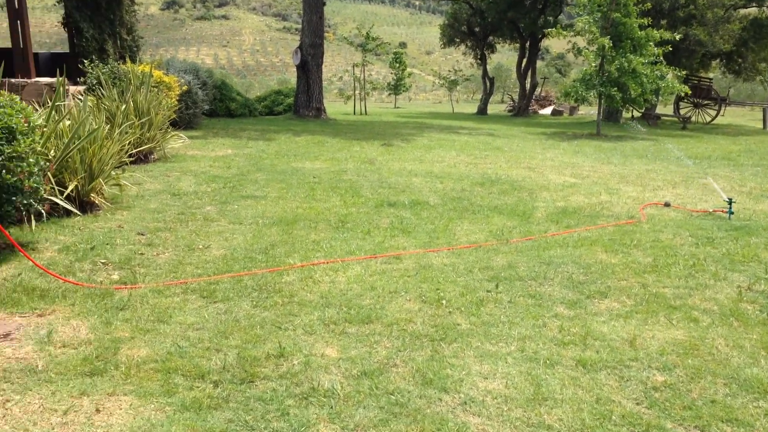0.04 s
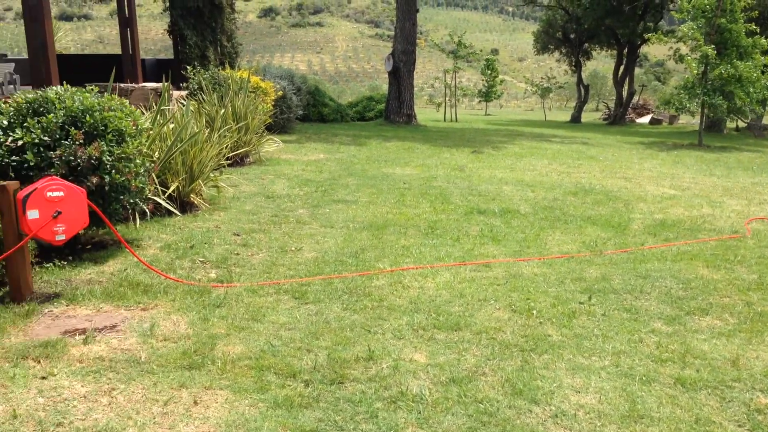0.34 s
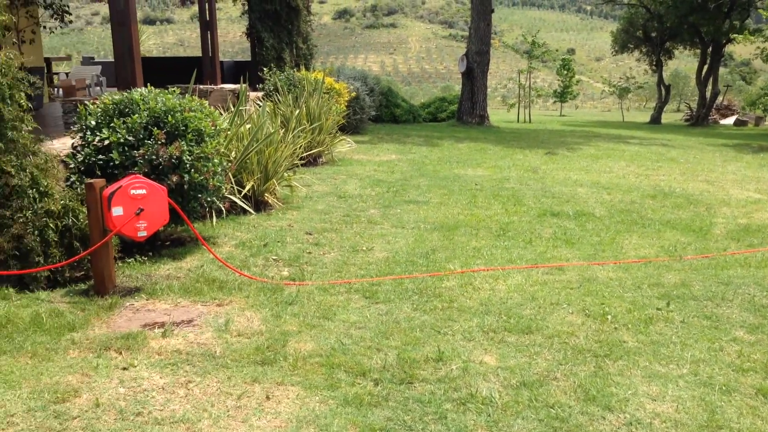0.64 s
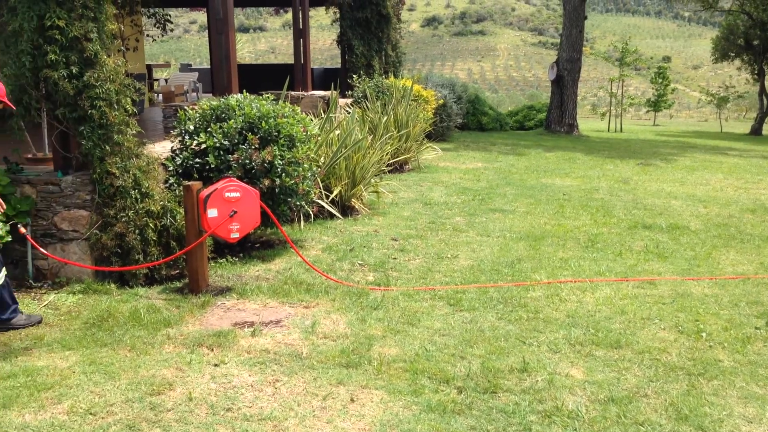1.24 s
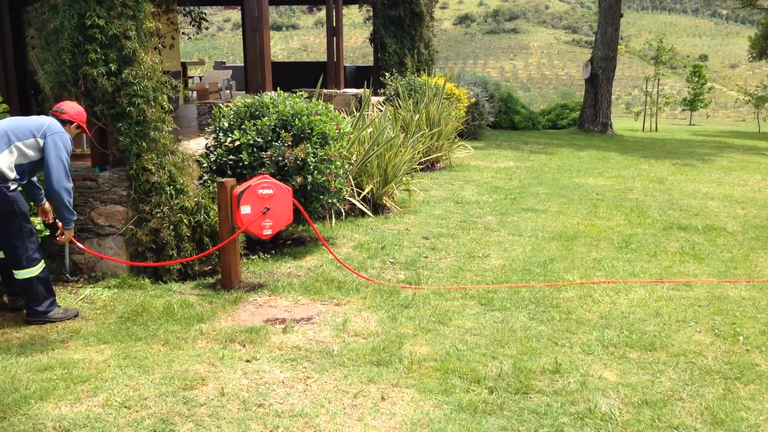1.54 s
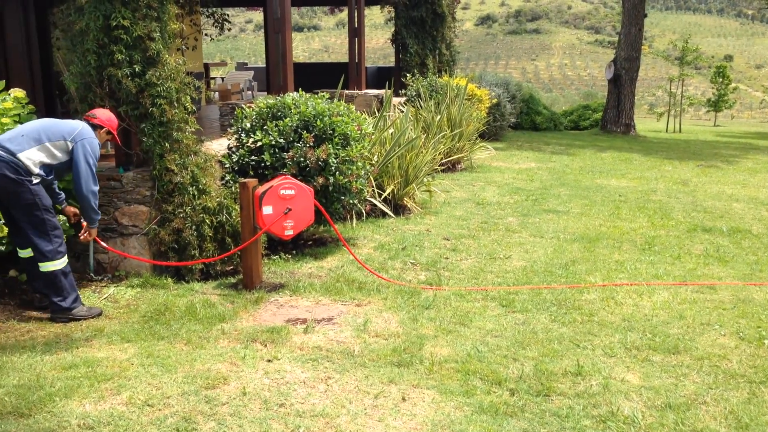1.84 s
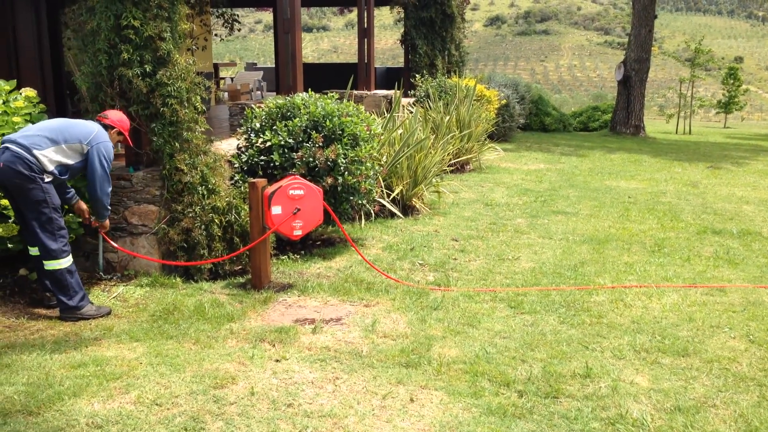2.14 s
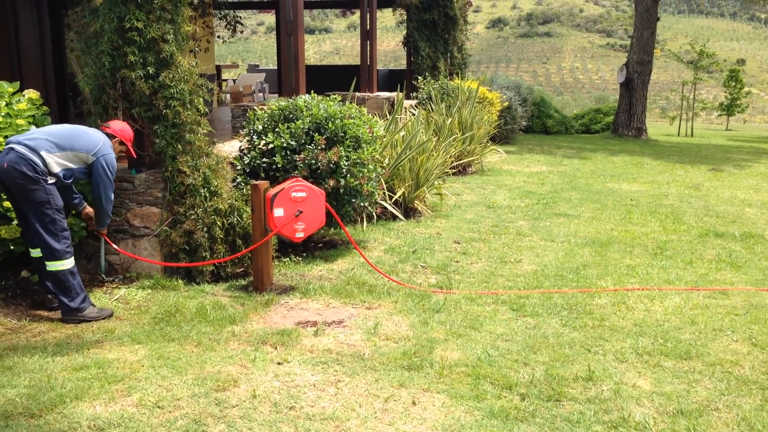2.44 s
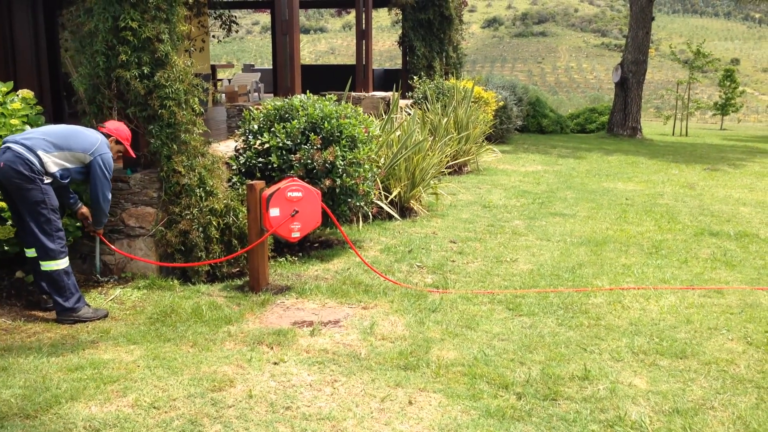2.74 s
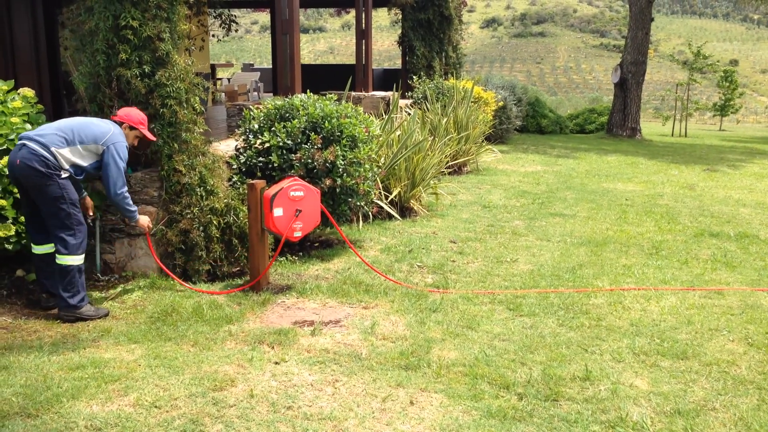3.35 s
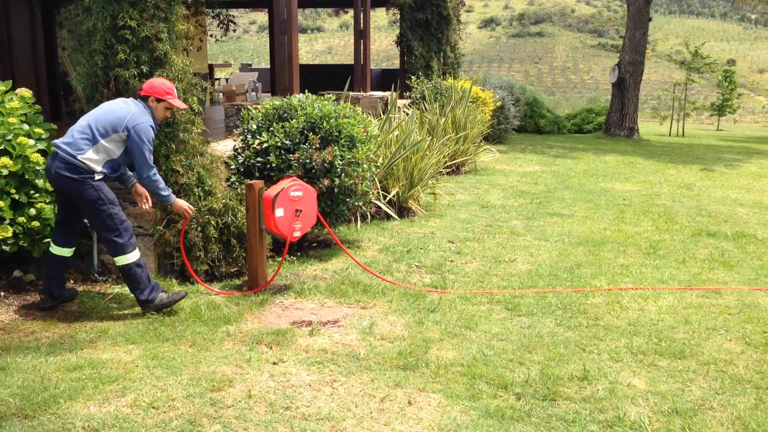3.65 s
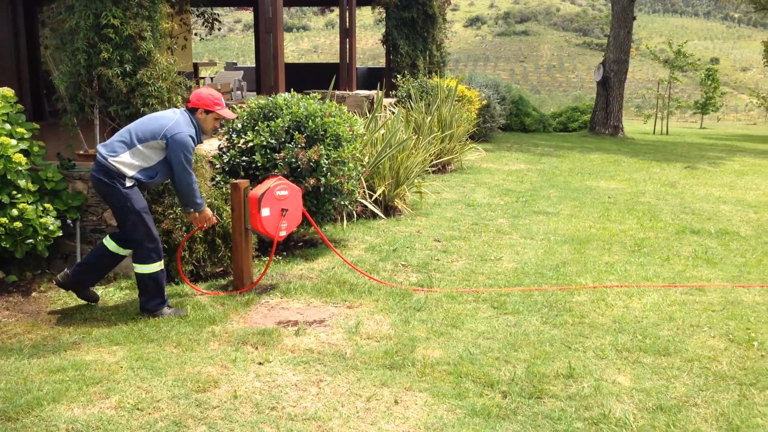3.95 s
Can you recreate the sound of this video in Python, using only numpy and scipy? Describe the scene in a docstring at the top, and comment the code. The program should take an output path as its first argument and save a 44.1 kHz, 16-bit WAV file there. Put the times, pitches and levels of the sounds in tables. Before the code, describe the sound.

A lawn sprinkler ticks rapidly in light wind, stops, then a hose coupling clicks.

```python
"""An impact sprinkler ticks across a quiet lawn about fifteen times a second while light wind buffets
and thumps the microphone. On each tick the arm slaps the jet and throws a short spit of spray, and
drops patter on the grass. At about two seconds the tap is closed: the ticking stops, the last drops
settle and the wind eases. A second later a hose coupling is unclipped with a few small clicks,
and a few soft buffets follow over the garden hush."""
import sys
import numpy as np
from scipy import signal
from scipy.fft import rfft, irfft
from scipy.io import wavfile
from scipy.ndimage import uniform_filter1d

SR = 44100
rng = np.random.default_rng(int(sys.argv[2]) if len(sys.argv) > 2 else 0)


def bounce(signal):
    """Save signal as a 16-bit WAV file at the path given by the first command-line argument."""
    frames = np.transpose(np.atleast_2d(signal))
    limited = np.clip(frames, -1, 1)
    pcm = np.round(limited * 32767).astype(np.int16)
    wavfile.write(sys.argv[1], SR, pcm)


N = 176400
TIME = np.arange(N) / SR

# Tone of the distant garden: frequency_hz, gain_db
GARDEN_EQ = [(25, 3), (70, 19), (140, -6), (450, 2), (720, -1.5), (1150, -8.5), (4000, -10.5), (7000, -17),
             (15000, -19)]
# Tone of the breeze between buffets: frequency_hz, gain_db
BREEZE_EQ = [(25, -21.5), (70, 1), (170, -4), (280, -12), (500, -24.5), (1500, -54.5)]
# Rise and fall of the breeze: time_s, level_db
BREEZE_FADER = [(0, -36.5), (.35, -38.5), (1.1, -37.5), (1.28, -49), (1.72, -40), (2.39, -49),
                (2.48, -67.5), (3.06, -63), (3.15, -52), (3.25, -66), (3.35, -53.5), (3.9, -73.5), (4, -55)]
# Wind buffets on the microphone: centre_s, half_length_s, relative_level_db, brightness_hz
WIND_BUFFETS = [(0.1, 0.026, -27.5, 437), (0.156, 0.029, -30, 430), (.424, 0.023, -18.5, 198),
                (0.464, 0.022, -23.5, 469), (.575, 0.0071, -27.5, 460), (0.621, 0.009, -22, 464),
                (0.662, 0.029, -21.5, 436), (0.776, 0.03, -28, 490), (1.027, 0.0099, -18.5, 291),
                (1.074, 0.011, -24, 287), (1.2, 0.019, -31.5, 247), (1.48, 0.016, -22, 433),
                (1.531, 0.0095, -23, 490), (1.559, 0.0073, -27.5, 370), (1.604, 0.011, -20, 426),
                (1.633, 0.0098, -21, 518), (1.659, 0.013, -24, 413), (1.866, 0.0077, -34.5, 380),
                (2.201, 0.027, -33.5, 365), (3.471, 0.026, -37, 129), (3.54, 0.011, -28, 290),
                (3.57, 0.011, -32, 323)]
# Single hard eddies on the microphone: centre_s, peak_db, pitch_hz
WIND_THUMPS = [(0.163, -15.5, 236), (.468, -19.5, 220), (.523, -22, 200), (.667, -22, 200),
               (.672, -15.5, 368), (1.377, -24, 150), (1.481, -17.5, 353), (1.607, -16, 334),
               (1.650, -12, 262), (1.674, -17, 228), (2.929, -36, 120)]
# Swell of the narrow hiss while water flows: time_s, level_db
HISS_FADER = [(.4, -83), (.6, -70.5), (1.4, -69.5), (1.6, -76), (2.3, -72), (2.6, -100)]
# Tone of drops on grass: frequency_hz, gain_db
DRIZZLE_EQ = [(800, 4.5), (1800, 1), (2400, -7.5), (2850, -7.5), (4200, 0), (6500, -4), (10000, -10),
              (15000, -14.5)]
# The patter, settling once the tap is closed: time_s, level_db
DRIZZLE_FADER = [(0, -61), (.7, -62.5), (1.9, -61.5), (2.15, -64.5), (3.2, -71.5), (4, -71)]
# Contacts as the coupling is unclipped: start_s, drive_db, decay_s, top_edge_hz, favoured_pitch_hz
COUPLING_CLICKS = [(3.0244, -34, 0.0015, 10800, 4900), (3.0952, -33.5, 0.0013, 14000, 3540),
                   (3.0983, -38, 0.0029, 14500, 12700), (3.1089, -38, 0.0033, 11200, 2670)]
# Ringing modes of the coupling: pitch_hz, width_hz, gain_db
COUPLING_MODES = [(2400, 370, 2), (3370, 670, 1), (4400, 850, 2.5), (6200, 1200, -9), (7900, 640, -7),
                  (9900, 2300, -5.5), (12500, 2600, 0)]
# Hits of the arm on the jet: start_s, relative_level_db
ARM_HITS = [(0.059, -38.5), (0.1268, -40), (0.1928, -42), (0.2595, -38), (0.3263, -38), (0.393, -36.5),
            (0.4601, -39.5), (0.5258, -43), (0.5908, -43), (0.6565, -45), (0.7224, -41.5), (0.7883, -43),
            (0.8531, -43), (0.9188, -44), (0.9851, -41.5), (1.05, -40), (1.116, -37), (1.181, -37.5),
            (1.2459, -38.5), (1.3135, -34), (1.3773, -39), (1.4434, -38), (1.5094, -37.5), (1.5745, -39.5),
            (1.64, -35), (1.7062, -34.5), (1.771, -34.5), (1.8367, -35), (1.9033, -34), (1.9687, -37),
            (2.031, -39.5)]
# Drift of the slap as the head turns and the jet weakens: time_s, pitch_hz
SLAP_TUNING = [(0, 4130), (.4, 4450), (1.05, 4300), (1.2, 4720), (1.9, 4630), (2.04, 4070)]
# Tone of the crack on each hit: frequency_hz, gain_db
CRACK_EQ = [(1500, -10.5), (2700, -10), (3600, 8), (6500, -3.5), (7400, 7.5), (9200, 6), (11000, -2.5),
            (15000, -3)]
# Tone of the spit of spray: frequency_hz, gain_db
SPIT_EQ = [(1500, -13.5), (2800, -11), (3700, -4), (5600, -4.5), (6650, -14), (7800, -8.5), (9400, -6.5),
           (11500, -10.5), (15000, -13.5)]
# Strength of the spray as the tap closes: time_s, gain_db
SPRAY_FADER = [(1.95, -0.5), (2.04, -11.5)]


def from_db(db):
    """Decibels to gain."""
    return 10 ** (np.asarray(db) / 20)


def unit_rms(x):
    """Scale to rms 1."""
    return x / np.sqrt(np.mean(x ** 2) + 1e-20)


def fader(rows):
    """Gain over time from (time_s, level_db) points."""
    return from_db(np.interp(TIME, *np.transpose(rows)))


def equalise(x, curve):
    """Minimum-phase EQ along a curve; white noise keeps its power."""
    hz, db = np.transpose(curve)
    bins_hz = np.fft.rfftfreq(8192, 1 / SR)
    gain = unit_rms(from_db(np.interp(np.log(bins_hz + 1), np.log(hz), db)))
    cepstrum = irfft(np.log(gain))
    half = len(cepstrum) // 2
    cepstrum[1:half] *= 2
    cepstrum[half + 1:] = 0  # no ringing ahead of an attack
    impulse = irfft(np.exp(rfft(cepstrum)))[:half]
    return signal.fftconvolve(x, impulse)[:len(x)]


def cut(x, hz, kind, order):
    """Butterworth low- or high-pass."""
    return signal.sosfilt(signal.butter(order, np.clip(hz, 10, SR * .45), kind, fs=SR, output="sos"), x)


def resonate(x, hz, width_hz):
    """Two-pole resonance with gain 1 at its peak."""
    radius = np.exp(-np.pi * width_hz / SR)
    feedback = [1, -2 * radius * np.cos(2 * np.pi * hz / SR), radius ** 2]
    return signal.lfilter(np.array([1, 0, -1]) * (1 - radius ** 2) / 2, feedback, x + 1e-18)


def envelope(t, rise_s, decay_s, hold_s=0):
    """Straight attack, hold, exponential release."""
    return np.clip(t / rise_s, 0, 1) * np.exp(-np.maximum(t - rise_s - hold_s, 0) / decay_s)


def flicker(depth_db, rate_hz):
    """A gain that wavers at random."""
    wander = cut(rng.standard_normal(N + SR), rate_hz, "low", order=2)[SR:]
    return unit_rms(from_db(depth_db * unit_rms(wander)))


def place(track, start_s, sound):
    """Mix a sound into a track at a time."""
    start = int(start_s * SR)
    sound, start = sound[max(-start, 0):], max(start, 0)
    track[start:start + len(sound)] += sound[:max(N - start, 0)]


def garden(level_db=-57.5):
    """A steady bed of far-off outdoor hush."""
    return from_db(level_db) * equalise(rng.standard_normal(N), GARDEN_EQ)


def breeze():
    """Moving air lays a fluttering low rumble on the microphone."""
    flutter = flicker(depth_db=2, rate_hz=45)
    return fader(BREEZE_FADER) * flutter * equalise(rng.standard_normal(N), BREEZE_EQ)


def buffets(trim_db=-2.5, smoothing_s=0.0129, lumpiness=0.051):
    """Bursts of lumpy eddies swell and fade on the microphone, each with its own brightness."""
    track, t = np.zeros(N), TIME[:SR // 4]
    middle_s = t[-1] / 2
    for centre_s, half_length_s, level_db, brightness_hz in WIND_BUFFETS:
        swell = 1 / np.cosh((t - middle_s) / half_length_s * np.pi / 2)
        eddies = cut(rng.standard_normal(len(t)), hz=120, kind="high", order=3)
        eddies = cut(eddies, 0.54 * brightness_hz, "low", order=2)
        eddies = unit_rms(cut(eddies, 1.13 * brightness_hz, "low", order=4))
        power = uniform_filter1d(eddies ** 2, int(smoothing_s * SR))
        flow = unit_rms(eddies / np.sqrt(power + .5))  # even out the flow
        lumps = flow * (1 + lumpiness * flow ** 2)  # the strongest eddies steepen
        lumps = cut(lumps, 2 * brightness_hz, "low", order=4)
        gain = from_db(level_db + trim_db) * np.sqrt(np.mean(swell ** 2))
        place(track, centre_s - middle_s, gain * unit_rms(lumps * swell))
    return track


def thumps(roll_off_hz=111):
    """A hard eddy is one round push of pressure; the microphone's bass roll-off makes it swing back."""
    track, t = np.zeros(N), TIME[:SR // 10]
    middle_s = t[-1] / 2
    for centre_s, peak_db, pitch_hz in WIND_THUMPS:
        push = 1 / np.cosh(2 * np.pi * pitch_hz * (t - middle_s))
        thump = cut(push, roll_off_hz, "high", order=3)
        place(track, centre_s - middle_s, from_db(peak_db) * thump / np.abs(thump).max())
    return track


def narrow_hiss():
    """A faint narrow hiss that comes and goes while the water runs."""
    waver = flicker(depth_db=4.5, rate_hz=40.4)
    band = resonate(rng.standard_normal(N), hz=2336, width_hz=190)
    return fader(HISS_FADER) * waver * unit_rms(band)


def drizzle(drops_per_s=9000, spread_db=2.5):
    """Thousands of tiny drops land on the grass and blur into a fine patter."""
    landings = (rng.random(N) < drops_per_s / SR) * rng.choice([-1, 1], N)
    sizes = from_db(spread_db * np.minimum(rng.exponential(1, N), 5))
    return fader(DRIZZLE_FADER) * unit_rms(equalise(landings * sizes, DRIZZLE_EQ))


def coupling(rise_s=0.00061, tail_db=-23, tail_s=0.024):
    """Short scraping contacts ring the modes of the hose coupling; each contact favours one pitch."""
    contacts, t = np.zeros(N), TIME[:SR // 10]
    tail = from_db(tail_db) * envelope(t, rise_s, tail_s)
    for start_s, drive_db, decay_s, top_edge_hz, favoured_hz in COUPLING_CLICKS:
        shape = envelope(t, rise_s, decay_s) + tail
        scrape = cut(rng.choice([-1, 1], len(t)) * shape, top_edge_hz, "low", order=6)
        ring = resonate(scrape, favoured_hz, width_hz=870)
        place(contacts, start_s, from_db(drive_db) * (scrape + ring))
    return sum(from_db(db) * resonate(contacts, hz, width_hz) for hz, width_hz, db in COUPLING_MODES)


def splash(samples, grain_db=4, ring_db=-4.5, low_hz=3540, high_hz=10100):
    """Grainy hiss of breaking water, coloured by four chance resonances that are new every time."""
    noise = rng.standard_normal(samples)
    grain = from_db(grain_db * np.clip(rng.standard_normal(samples), -2, 2))
    pitches_hz = low_hz * (high_hz / low_hz) ** rng.random(4)
    rings = sum(resonate(rng.standard_normal(samples), hz, width_hz=550) for hz in pitches_hz)
    return unit_rms(unit_rms(noise * grain) + from_db(ring_db) * unit_rms(rings))


def arm_slap(t, pitch_hz, width_hz=560, grit=0.097, grit_decay_s=0.0017):
    """The arm strikes the jet: an impulse with a little grit rings briefly at one pitch."""
    strike = (t == 0) + grit * rng.standard_normal(len(t)) * np.exp(-t / grit_decay_s)
    ring = resonate(strike, pitch_hz, width_hz)
    return unit_rms(resonate(ring, pitch_hz, 3 * width_hz))


def sprinkler(slap_db=-4.5, crack_db=-8.5, spit_db=-50.5, echo_db=-59, rise_s=0.0005):
    """Each hit of the arm is a pitched slap with a bright crack, then a spit of spray and a faint echo."""
    slaps, cracks, spits = np.zeros((3, N))
    t = TIME[:SR // 10]
    average_db = np.mean([level_db for _, level_db in ARM_HITS])
    crack_shape = envelope(t, rise_s, hold_s=rise_s, decay_s=0.00027)
    spit_shape = envelope(t, rise_s, hold_s=0.0075, decay_s=0.0044)
    echo_shape = envelope(t, rise_s=0.0075, decay_s=0.019)
    for start_s, level_db in ARM_HITS:
        pitch_hz = np.interp(start_s, *np.transpose(SLAP_TUNING))
        pitch_hz *= 1 + .02 * rng.standard_normal()  # no two ticks ring quite alike
        slap = from_db(slap_db) * arm_slap(t, pitch_hz)
        echo = from_db(echo_db) * rng.standard_normal(len(t)) * echo_shape
        crack = from_db(crack_db) * unit_rms(splash(len(t)) * crack_shape)
        spit = from_db(spit_db) * splash(len(t)) * spit_shape
        hit_gain = from_db(level_db) * np.sqrt(.003 * SR / len(t))  # the energy of a 3 ms burst
        spray_gain = from_db(0.31 * (level_db - average_db))  # harder hits spit only a little louder
        place(slaps, start_s, hit_gain * slap)
        place(cracks, start_s - rise_s / 2, hit_gain * crack)
        place(spits, start_s, spray_gain * (spit + echo))
    spray = equalise(cracks, CRACK_EQ) + equalise(spits, SPIT_EQ)
    return slaps + fader(SPRAY_FADER) * spray


def scene():
    """Water, coupling, wind and garden meet at one microphone."""
    water = sprinkler() + drizzle() + narrow_hiss()
    clicks = coupling()
    wind = buffets() + breeze() + thumps()
    return (water + clicks + wind + garden())[None]


def record(dry):
    """A steep low-pass takes off the air above 15.3 kHz."""
    return signal.sosfilt(signal.ellip(12, .1, 70, 15300, fs=SR, output="sos"), dry)


dry = scene()
out = record(dry)
bounce(out)
```